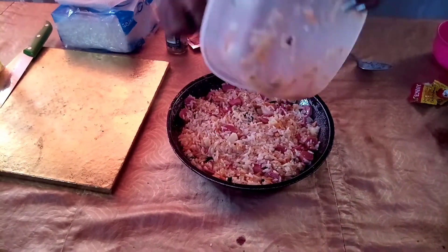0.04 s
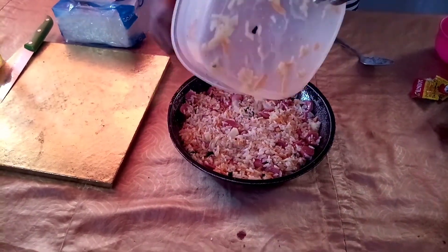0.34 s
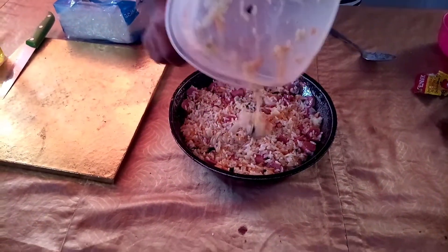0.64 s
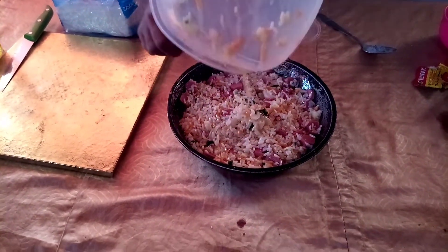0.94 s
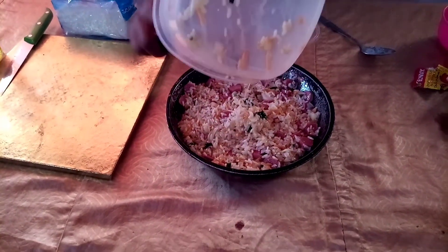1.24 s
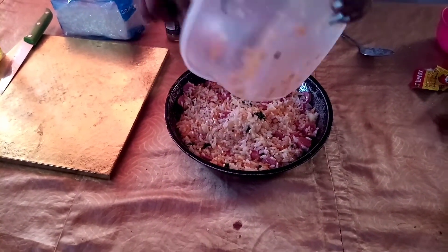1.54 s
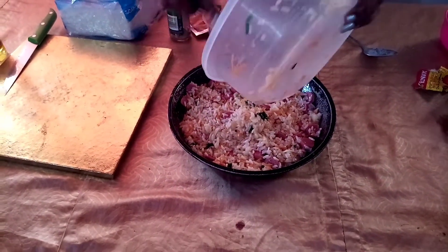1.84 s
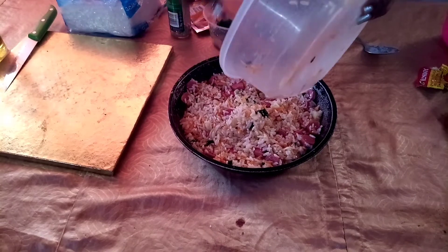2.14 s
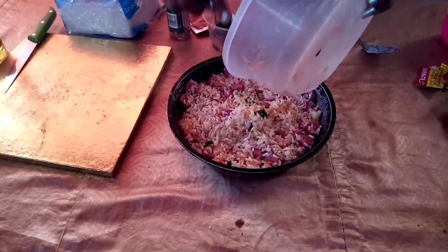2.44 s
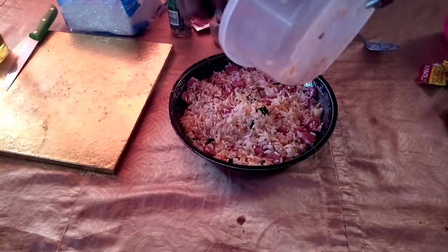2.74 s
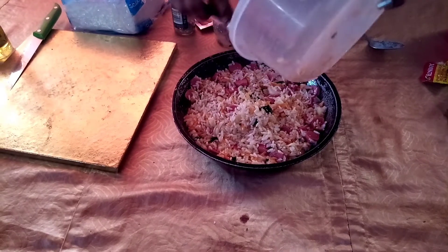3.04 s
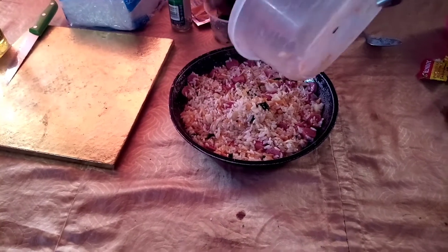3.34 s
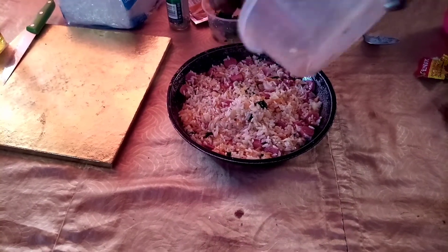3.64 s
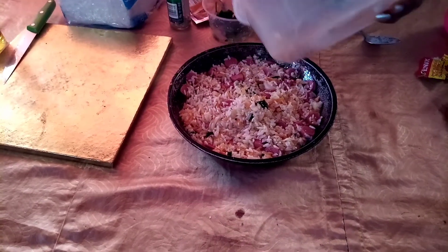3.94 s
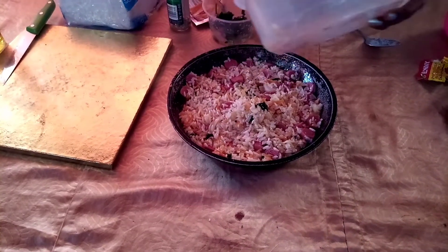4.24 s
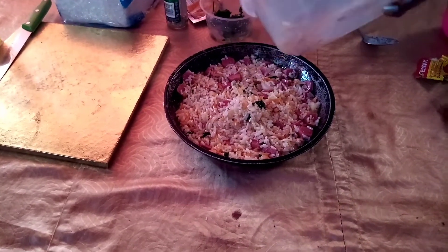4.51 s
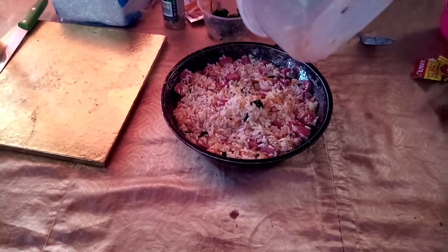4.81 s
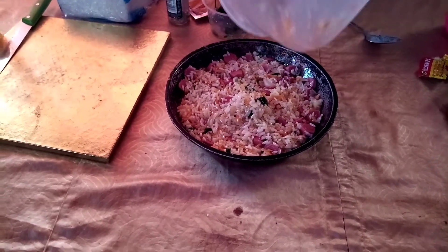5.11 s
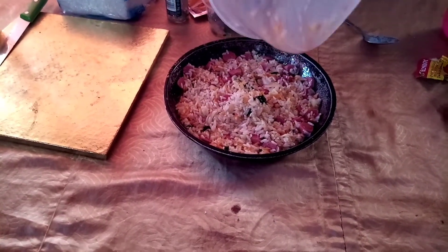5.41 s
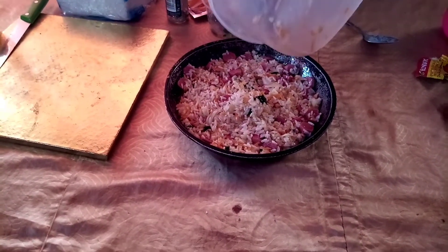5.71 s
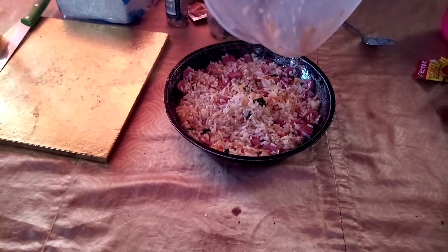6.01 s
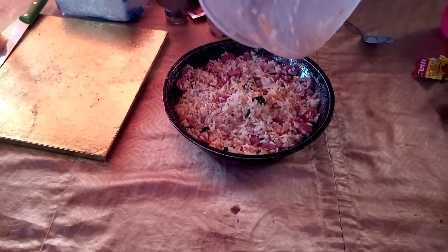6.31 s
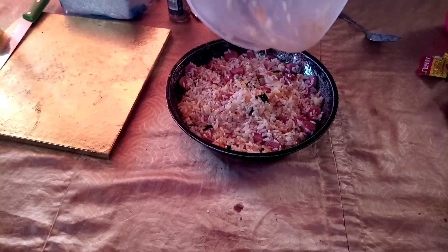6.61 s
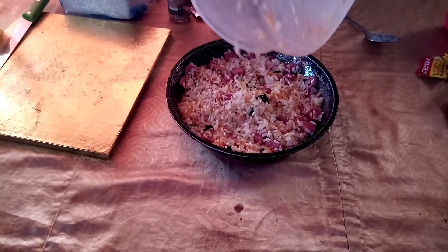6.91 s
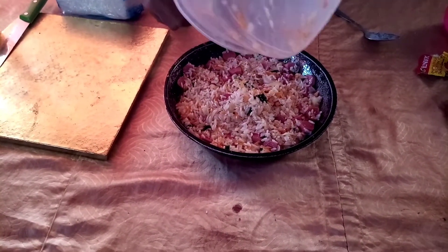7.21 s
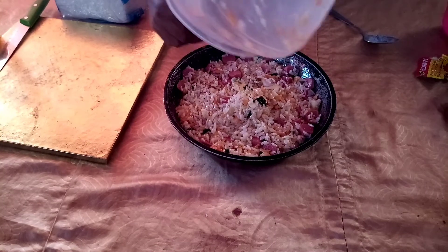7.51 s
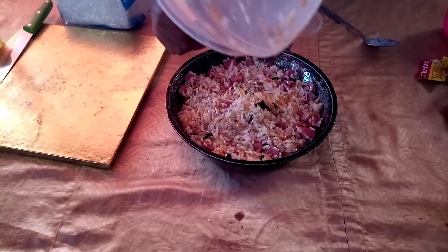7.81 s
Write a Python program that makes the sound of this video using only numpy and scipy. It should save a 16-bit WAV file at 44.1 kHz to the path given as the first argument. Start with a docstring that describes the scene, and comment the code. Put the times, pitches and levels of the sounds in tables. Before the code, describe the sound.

A spoon knocks and scrapes moist rice out of a plastic tub, with hollow taps, gritty drags and occasional dull bumps against a pan.

```python
"""Scraping out a plastic tub

In a small kitchen, a spoon clears the last of a moist rice mixture out of a tub held over a frying pan.
About three strokes a second: each lands with a hollow knock on the wall and runs on as a gritty scrape,
sticking and slipping over wet grains. Now and then the tub bumps the pan, which rings dully;
a thin squeak sounds twice."""
import sys
import numpy as np
from scipy import signal
from scipy.fft import rfft, irfft, next_fast_len
from scipy.io import wavfile

SR = 44100
rng = np.random.default_rng(int(sys.argv[2]) if len(sys.argv) > 2 else 0)


def persist_wave(psi):
    """Save psi, clipped to +-1, as 16-bit WAV."""
    counts = np.round(np.clip(psi, -1, 1) * 32767).astype(np.int16)
    wavfile.write(sys.argv[1], SR, np.atleast_2d(counts).T)


N = 351036
TIME = np.arange(N) / SR

# Room tone spectrum: freq_hz, relative_db
ROOM_TONE = [(25, 15), (150, 9), (1000, -22), (4000, -10.5), (12000, -20)]
# Decay of the kitchen reverb: freq_hz, t60_s
ROOM_DECAY = [(100, 0.36), (700, 0.55), (2500, 0.59), (5000, .5), (13000, 0.2)]
# Colour of the kitchen reverb: freq_hz, level_db
ROOM_COLOUR = [(100, -8.5), (400, -5.5), (3000, -6), (14000, -8)]
# Thin squeaks: start_s, length_s, pitch_hz, level_db
SQUEAKS = [(5.916, 0.13, 4130, -53), (6.343, 0.17, 4150, -67)]
# The tub bumps the pan: start_s, level_db
PAN_BUMPS = [(0.002, -47.5), (1.601, -38.5), (3.620, -32), (5.628, -36.5)]
# Ring of the pan, damped by its load: pitch_hz, relative_db, t60_s
PAN_MODES = [(632, -11.5, 0.1), (679, 3, 0.16), (724, -2.5, 0.23), (785, -12, 0.16), (1497, -29.5, .2)]
# Resonances of the plastic tub, plus a thin microphone peak near 15 kHz: centre_hz, width_hz, gain_db
COLOUR_PEAKS = [(1520, 140, -10.5), (2580, 365, -1.5), (5040, 470, -6), (6524, 410, -0.5), (14930, 120, 18)]
# The tilting tub aims its top end toward or away from the listener: time_s, gain_db
FACING = [(0.0, -20), (1.2, -6), (1.9, 3), (4.4, 3.5), (5.8, -3.5), (7.9, -6.5)]
# The spoon catches on wet grains and skips: start_s, relative_db, pitch_hz
SKIPS = [(0.288, -46, 3000), (0.521, -37, 6640), (0.657, -42.5, 6040), (1.159, -41.5, 4300),
         (1.249, -37, 3300), (1.358, -45, 3500), (2.039, -38, 2560), (2.252, -36, 2560),
         (2.272, -31.5, 5780), (3.962, -38.5, 2300), (4.353, -36.5, 5540), (4.633, -37.5, 4800),
         (4.763, -35.5, 4500), (5.079, -32.5, 7300), (6.133, -38.5, 1740), (6.289, -47.5, 2549),
         (6.6, -29.5, 1110), (6.653, -31, 5650), (6.678, -38, 6460), (7.299, -35.5, 916),
         (7.799, -36, 3320), (7.815, -34.5, 3230)]
# Scrapes along the wall: start_s, time_to_peak_s, length_s, hiss_relative_db, rub_relative_db
SCRAPES = [(0.0, 0.013, 0.29, -50, -49), (0.453, 0.091, 0.13, -43.5, -50.5),
           (0.627, 0.043, 0.068, -52, -55.5), (0.841, 0.029, 0.14, -54.5, -52),
           (0.963, 0.04, 0.042, -46, -54.5), (1.162, 0.09, 0.17, -49, -52),
           (1.592, 0.044, 0.15, -44.5, -57), (1.872, 0.095, 0.17, -41, -50), (2.19, 0.06, 0.12, -40.5, -45),
           (2.494, 0.029, 0.18, -45.5, -46.5), (2.868, 0.1, 0.1, -36.5, -38.5),
           (3.154, 0.11, 0.18, -44.5, -50.5), (3.503, 0.096, .15, -41.5, -45.5),
           (3.876, 0.089, 0.096, -45.5, -38), (4.194, 0.18, .2, -43, -56.5), (4.532, 0.066, 0.29, -43, -46),
           (4.951, .02, 0.19, -42, -44), (5.301, 0.028, 0.091, -38.5, -37.5),
           (5.634, 0.095, 0.28, -45.5, -44), (6.07, .05, 0.1, -45, -43.5), (6.23, 0.041, .06, -57.5, -53),
           (6.505, 0.13, 0.16, -40, -45.5), (6.919, 0.025, 0.067, -44, -46.5),
           (7.052, 0.032, 0.066, -52.5, -63.5), (7.298, 0.042, 0.12, -42.5, -48),
           (7.701, .11, 0.11, -51, -40)]
# EQ of the gritty hiss at the spoon's edge: freq_hz, relative_db
HISS_EQ = [(800, -40.5), (1800, -9), (2600, 0.5), (4000, 3.5), (6000, 1), (7500, -0.5), (9500, -1.5),
           (12000, -35), (15000, -27)]
# EQ of the low rub of the wall: freq_hz, relative_db
RUB_EQ = [(90, -36), (165, 9.5), (430, -0.5), (700, 2.5), (950, -4), (1400, 2), (2100, -6.5), (5000, -24)]
# Low boom of the tub: pitch_hz, relative_db, t60_s
TUB_MODES = [(162, -9.5, 0.028), (251, -24, 0.044), (299.2, -2, 0.055), (375.5, -20.5, 0.21)]
# Hollow ring of the air in the tub: pitch_hz, relative_db, t60_s
AIR_MODES = [(400, -6.5, 0.4), (450, -13, 0.44)]
# Body, clack and tick of a knock, a row each: low_hz, high_hz, relative_db, t60_s
KNOCK_BANDS = [(348, 1230, -2, 0.062), (1030, 4440, -1.5, 0.028), (3260, 8020, -3.5, 0.015)]
# The spoon lands on the wall: start_s, strength_db, thud_relative_db, tick_relative_db, wall_hz, clack_hz
KNOCKS = [(0.002, -49, 11, 1.5, 168, 2870), (0.4498, -41, 4.5, -2, 256, 1390),
          (0.8333, -32.5, 2.5, 5, 283, 2530), (1.1685, -34.5, 6, 1, 277, 1720),
          (1.2005, -37.5, -6, -6, 302, 1400), (1.6012, -30.5, -2, 5, 175, 2650),
          (1.878, -33.5, -2, -0.5, 207, 1260), (1.9255, -33.5, -7.5, -7, 360, 1290),
          (2.1736, -29.5, -1.5, 2, 415, 2570), (2.195, -32, 5, -3, 227, 1910),
          (2.2725, -35, -14.5, 10.5, 257, 2010), (2.4972, -29, -2.5, -0.5, 162, 1800),
          (2.838, -36, -23, -2, 385, 3550), (2.85, -31.5, -5.5, -2.5, 170, 1820),
          (2.868, -32, -0.5, 0, 308, 2240), (3.1569, -35.5, -10, 1, 164, 2600),
          (3.215, -49.5, 8, -3, 238, 1450), (3.509, -32, 5, -1.5, 170, 1590),
          (3.6202, -33.5, -2, 1, 181, 2280), (3.8744, -27.5, -0.5, -2.5, 320, 1090),
          (4.19, -29.5, -12.5, 2, 145, 1560), (4.2182, -34, -3.5, -4, 150, 2270),
          (4.5429, -28, -16, -1.5, 167, 2480), (4.6887, -31.5, -13, -34, 350, 2820),
          (4.9451, -27.5, 3, 0, 464, 2680), (5.305, -23.5, -5.5, -10.5, 333, 1470),
          (5.6268, -31, 1.5, 2.5, 191, 2700), (6.0665, -35, -1, -1, 215, 3600),
          (6.4954, -35.5, 4, 4, 405, 1420), (6.911, -42.5, -6, -1, 260, 1590),
          (6.9194, -30, -1.5, -2.5, 292, 1330), (7.307, -36.5, 4.5, -2, 365, 2900),
          (7.3441, -34.5, -2.5, 1.5, 164, 2370), (7.707, -29.5, 2, 1.5, 410, 1275)]


def from_db(db):
    """Decibels to gain."""
    return 10 ** (np.asarray(db) / 20)


def unit_rms(x):
    """Scale to rms 1."""
    return x / np.sqrt(np.mean(x ** 2) + 1e-20)


def unit_hit(x):
    """Scale a hit to the energy of 5 ms at rms 1."""
    return x * np.sqrt(.005 * SR / np.sum(x ** 2))


def at_hz(points, hz):
    """Read a curve on a log-frequency axis."""
    freqs, values = np.transpose(points)
    return np.interp(np.log(np.maximum(hz, 1)), np.log(freqs), values)


def add(track, start_s, sound):
    """Drop a sound onto the track."""
    start = max(round(start_s * SR), 0)
    track[start:start + len(sound)] += sound[:N - start]


def band(x, low_hz, high_hz):
    """Gentle band-pass."""
    return signal.sosfilt(signal.butter(2, [low_hz, high_hz], "band", fs=SR, output="sos"), x)


def resonance(x, hz, width_hz):
    """Two-pole resonance, unity gain at its peak."""
    return signal.lfilter(*signal.iirpeak(hz, hz / width_hz, fs=SR), x)


def coloured(x, eq):
    """Run a steady signal through an EQ curve; rms 1."""
    size = next_fast_len(N)
    gain = from_db(at_hz(eq, np.fft.rfftfreq(size, 1 / SR)))
    return unit_rms(irfft(rfft(x, size) * gain, size)[:N])


def drift(per_s):
    """Random modulator gliding through per_s values a second; rms 1."""
    knots = rng.standard_normal(4096)
    return unit_rms(np.interp(TIME * per_s, np.arange(len(knots)), knots))


def fade(t, t60):
    """Exponential decay, 60 dB down after t60 seconds."""
    return np.exp(-np.log(1000) * t / t60)


def struck(modes, t):
    """Modes rung by one hit, each a couple of dB up or down by chance."""
    return sum(from_db(db + 2 * rng.standard_normal()) * np.sin(2 * np.pi * hz * t) * fade(t, t60)
               for hz, db, t60 in modes)


def crack(t, low_hz, high_hz, t60, snap):
    """A contact click, then a noise burst for the crowded short modes of thin plastic."""
    burst = rng.standard_normal(len(t)) * fade(t, t60)
    burst[0] += snap
    return band(burst, low_hz, high_hz)


def room_tone(level_db):
    """A faint, steady bed of bass-heavy noise."""
    return from_db(level_db) * coloured(rng.standard_normal(N), ROOM_TONE)


def kitchen_reverb(x, first_echo_s, build_s):
    """A diffuse tail that builds after the first echo and dies at its own pace in each band."""
    t = TIME[:SR * 3 // 4]
    noise = rng.standard_normal((2, len(t)))
    edges_hz = np.geomspace(60, 17000, 13)
    onset = 1 - np.exp(-np.maximum(t - first_echo_s, 0) / build_s)
    tail = np.zeros(len(t))
    for k, (low, high) in enumerate(zip(edges_hz, edges_hz[1:])):
        hz = np.sqrt(low * high)
        envelope = onset * fade(t, at_hz(ROOM_DECAY, hz))
        envelope /= np.linalg.norm(envelope)
        tail += from_db(at_hz(ROOM_COLOUR, hz)) * band(noise[k % 2], low, high) * envelope
    return signal.fftconvolve(x, tail)[:N]


def squeaks(waver_hz, rise_hz_per_s, octave_db):
    """A thin wavering tone with a faint octave swells and fades, rising slightly."""
    out = np.zeros(N)
    for start_s, length_s, hz, db in SQUEAKS:
        t = TIME[:int(length_s * SR)]
        pitch_hz = hz + rise_hz_per_s * (t - length_s / 2) + waver_hz * drift(220)[:len(t)]
        phase = 2 * np.pi * np.cumsum(pitch_hz) / SR
        tone = np.sin(phase) + from_db(octave_db) * np.sin(2 * phase)
        swell = np.sin(np.pi * t / length_s) ** 2
        add(out, start_s, from_db(db) * swell * tone)
    return out


def pan(bump_db):
    """The tub meets the loaded pan: a dull bump and a short ring."""
    out, t = np.zeros(N), TIME[:SR // 2]
    for start_s, db in PAN_BUMPS:
        bump = from_db(bump_db) * unit_hit(crack(t, 320, 680, t60=0.076, snap=2.6))
        add(out, start_s, from_db(db) * (struck(PAN_MODES, t) + bump))
    return out


def tub_and_mic_colour(x):
    """Layer on the resonances of the plastic tub, plus a thin, bright microphone peak near 15 kHz."""
    return x + sum(from_db(db) * resonance(x, hz, width_hz) for hz, width_hz, db in COLOUR_PEAKS)


def beaming(time_s):
    """Gain of the top end, which beams out of the opening as the tub tilts."""
    return from_db(np.interp(time_s, *np.transpose(FACING)))


def skips(gain_db, click_db, squish_t60):
    """The spoon catches on a wet grain: a soft click and a short pitched squish."""
    out, t = np.zeros(N), TIME[:SR // 20]
    for start_s, db, hz in SKIPS:
        click = from_db(click_db) * unit_hit(crack(t, 900, 5400, t60=.014, snap=1.4))
        burst = rng.standard_normal(len(t)) * fade(t, squish_t60)
        squish = unit_hit(resonance(burst, hz, hz / 4))
        add(out, start_s, from_db(gain_db + db) * (click + squish))
    return out


def stick_slip(per_s, spread_db, smear):
    """Stick and slip over wet grains: clusters of uneven clicks on smooth friction noise."""
    sizes = from_db(spread_db * np.minimum(rng.exponential(1, N), 4)) * rng.choice([-1, 1], N)
    clustering = np.exp(.5 * drift(110))
    clicks = sizes * (rng.random(N) < clustering * per_s / SR)
    return unit_rms(clicks) + smear * rng.standard_normal(N)


def squelch(x, patchy_db, per_s):
    """Wet pockets under the spoon open and close, so narrow resonances come and go."""
    pockets = [from_db(patchy_db * drift(per_s)) * resonance(x, hz, hz / 9) * (-1) ** k
               for k, hz in enumerate(np.geomspace(400, 12000, num=24))]
    return unit_rms(sum(pockets))


def pressure(bite_s, swell_db, ease_db_per_s, lift_db_per_s):
    """Envelopes for hiss and rub: the spoon bites, swells to its hardest push, eases and lifts off."""
    hiss, rub, t = np.zeros(N), np.zeros(N), TIME[:SR // 2]
    for start_s, peak_s, length_s, hiss_db, rub_db in SCRAPES:
        swell = swell_db * np.maximum(1 - t / peak_s, 0)
        ease = ease_db_per_s * np.maximum(t - peak_s, 0)
        lift = lift_db_per_s * np.maximum(t - length_s, 0)
        envelope = np.minimum(t / bite_s, 1) * from_db(-swell - ease - lift)
        add(hiss, start_s, from_db(hiss_db) * envelope)
        add(rub, start_s, from_db(rub_db) * envelope)
    return hiss, rub


def scrapes(hiss_db, rub_db, sizzle_db, judder_db):
    """The spoon's edge drags under juddering pressure: gritty hiss, fine sizzle on top, low wall rub."""
    hiss_gain, rub_gain = pressure(bite_s=0.004, swell_db=18, ease_db_per_s=62.5, lift_db_per_s=603)
    grit = stick_slip(per_s=1900, spread_db=2.5, smear=0.1)
    wet_grit = squelch(grit, patchy_db=3.2, per_s=90)
    hiss = from_db(hiss_db) * coloured(wet_grit + .5 * grit, HISS_EQ)
    sizzle = from_db(sizzle_db) * beaming(TIME) * unit_rms(band(grit, 9000, 15200))
    drag = stick_slip(per_s=2000, spread_db=4, smear=1.0)
    wet_drag = squelch(drag, patchy_db=4.0, per_s=70)
    rub = from_db(rub_db) * coloured(wet_drag + 0.19 * drag, RUB_EQ)
    judder = from_db(judder_db * drift(170))
    return judder * (hiss_gain * (hiss + sizzle) + rub_gain * rub)


def knocks(wall_db, wall_cycles, boom_db, body_db, in_tune_db, ring_db, clack_q, sparkle_db):
    """The spoon lands: the wall flexes, the tub booms and cracks; the spot sets wall and clack pitch."""
    out, t = np.zeros(N), TIME[:SR // 3]
    tub_hz, air_hz = TUB_MODES[0][0], AIR_MODES[1][0]
    for start_s, strength_db, thud_db, tick_db, wall_hz, clack_hz in KNOCKS:
        wall = from_db(wall_db) * np.sin(2 * np.pi * wall_hz * t) * fade(t, wall_cycles / wall_hz)
        # a stiff, high-pitched spot moves the whole tub less
        boom = from_db(boom_db) * tub_hz / wall_hz * struck(TUB_MODES, t)
        thud = from_db(thud_db) * band(wall + boom, 135, 890)
        # the air in the tub answers most when the wall flexes near its pitch
        in_tune = np.exp(-3 * abs(np.log(wall_hz / air_hz)))
        body_gain = from_db(body_db + in_tune_db * in_tune)
        hollow = in_tune * body_gain * struck(AIR_MODES, t)
        body, clack, tick = [crack(t, low, high, t60, snap=6.4) for low, high, _, t60 in KNOCK_BANDS]
        clack += from_db(ring_db) * resonance(clack, clack_hz, clack_hz / clack_q)
        tick += from_db(sparkle_db) * beaming(start_s) * crack(t, 9000, 15500, t60=.007, snap=4)
        body, clack, tick = [from_db(db) * unit_hit(layer)
                             for (_, _, db, _), layer in zip(KNOCK_BANDS, (body, clack, tick))]
        knock = body_gain * body + clack + from_db(tick_db) * tick + hollow - thud
        add(out, start_s, from_db(strength_db) * knock)
    return out


def scene():
    """Mono mix: spoon, tub and pan up front, kitchen reverb around them, room tone underneath."""
    contacts = knocks(wall_db=3.5, wall_cycles=9.5, boom_db=1.0, body_db=-9, in_tune_db=7.5,
                      ring_db=6.5, clack_q=5.9, sparkle_db=-16.0)
    contacts += skips(gain_db=-7, click_db=-2.5, squish_t60=0.046)
    contacts += scrapes(hiss_db=-4, rub_db=-5.0, sizzle_db=-19.5, judder_db=2.08)
    direct = tub_and_mic_colour(contacts) + pan(bump_db=2.5)
    direct += squeaks(waver_hz=25.1, rise_hz_per_s=900, octave_db=-23)
    bed = room_tone(level_db=-77)
    reverb = kitchen_reverb(direct, first_echo_s=0.0022, build_s=0.00073)
    return (direct + reverb + bed)[None]


def record(dry):
    """The microphone thins the deep bass; a steep cut takes off the very top."""
    low_cut = signal.butter(2, 70, "high", fs=SR, output="sos")
    high_cut = signal.ellip(10, .3, 70, 15750, fs=SR, output="sos")
    return signal.sosfilt(high_cut, signal.sosfilt(low_cut, dry))


dry = scene()
out = record(dry)
persist_wave(out)
```